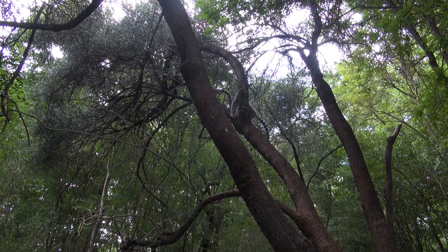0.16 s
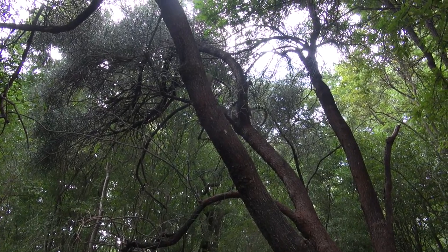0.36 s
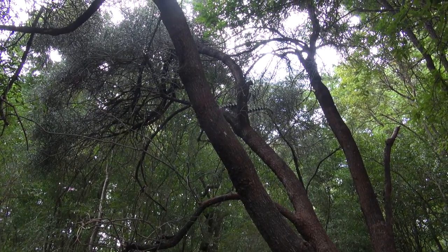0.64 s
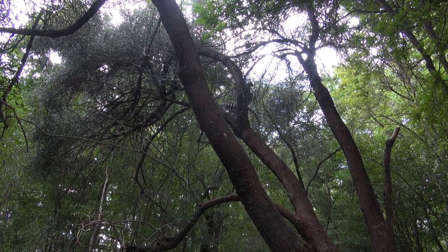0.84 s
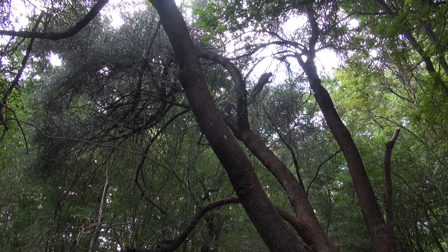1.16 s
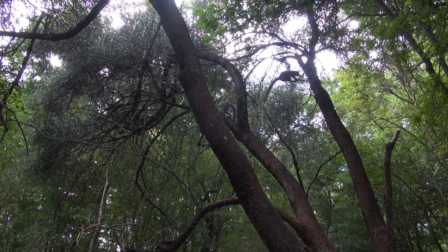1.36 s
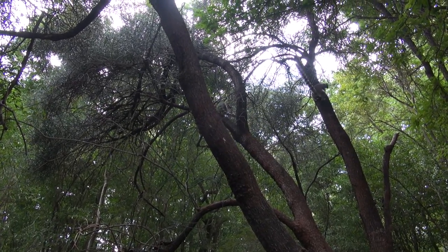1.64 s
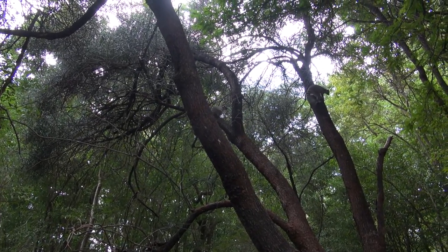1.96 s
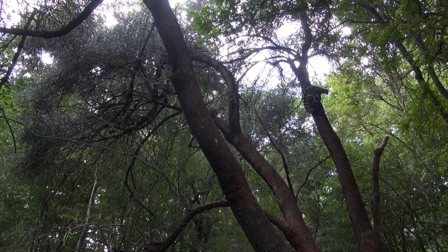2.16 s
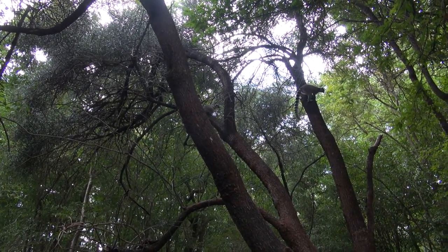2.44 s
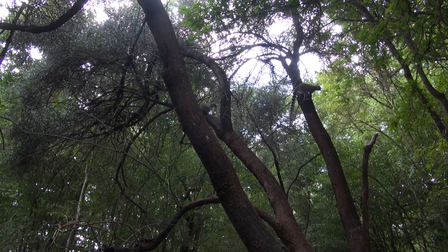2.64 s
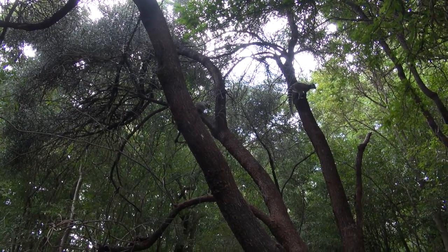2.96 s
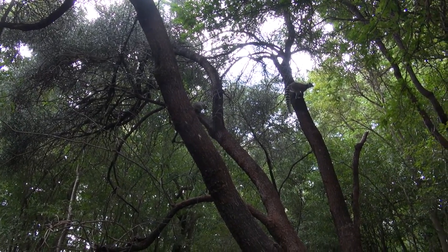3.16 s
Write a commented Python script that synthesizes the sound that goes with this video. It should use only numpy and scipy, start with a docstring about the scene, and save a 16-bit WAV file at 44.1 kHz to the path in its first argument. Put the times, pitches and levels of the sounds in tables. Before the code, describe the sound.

A lemur close by gives very short nasal grunts with tiny mouth ticks, sparse at first, quicker from 1.3 to 2.6 seconds, loudest at 3. Faint twig snaps and leaf brushes come at the start and around 1.1 seconds. From 1.4 to 1.8 seconds another lemur chitters four high, rising, rattling squeaks that scatter off the trees. Soft hiss and a faint camera whir run throughout.

```python
"""A quiet forest, with lemurs. One, close to the microphone, gives short nasal grunts: throat pulses
ringing in nose and mouth, with tiny ticks as the mouth opens. Another, leaping between trunks, gives a
harsh four-note chitter, a squeak chopped into a rattle. Twigs snap, leaves brush and a far bird sounds
one thin note. Calls and snaps scatter off the trunks; under it all lie a soft hiss and the whir and
hum of the camera."""
import sys
import numpy as np
from scipy import signal
from scipy.fft import rfft, irfft
from scipy.io import wavfile
from scipy.ndimage import uniform_filter1d

SR = 44100
rng = np.random.default_rng(int(sys.argv[2]) if len(sys.argv) > 2 else 0)


def store_wav(level_fs):
    """Save 16-bit WAV to argv[1]."""
    pcm = np.round(np.clip(np.atleast_2d(level_fs), -1, 1) * 32767)
    wavfile.write(sys.argv[1], SR, pcm.T.astype(np.int16))


N = 145530

# The close lemur's grunts; the strongest may come in two quick pushes (start [s], length [s],
# level [dB], pitch [Hz], pitch rise [share], rasp re voice [dB], mouth resonance [Hz], mouth gain [dB])
GRUNTS = [(0.0, .011, -44, 197, -0.14, -12.5, 370, -8), (0.449, 0.02, -41.5, 256, 0.13, -20, 536, -9),
          (0.475, 0.015, -40, 270, 0.32, -18, 667, 16), (0.852, 0.019, -37, 265.7, 0.093, -18.5, 530, -5),
          (1.317, 0.014, -48, 178.4, 0.3, -13, 260, 5), (1.455, 0.023, -38.5, 308, 0.23, -10, 315, -12),
          (1.568, 0.0092, -46.5, 182, 0.09, -9, 545, 13), (1.69, 0.017, -45, 180, 0.013, -12.5, 550, 11),
          (1.803, 0.025, -49, 173.3, 0.021, -8.5, 560, 11), (1.915, 0.025, -51, 177.4, 0.18, -11, 523, 7),
          (2.034, 0.0085, -54, 191, -0.068, -11, 546, 12), (2.151, .012, -49, 181, .12, -13, 534, 14),
          (2.278, 0.011, -41.5, 268.4, 0.029, -12.5, 675, 14), (2.2905, .015, -39, 267, -.15, -16, 620, 4),
          (2.399, 0.019, -53, 258, 0.048, -9, 540, -1), (2.466, 0.015, -52.5, 243, .072, -26, 540, -3),
          (2.534, 0.017, -48.5, 244, 0.065, -17, 400, 8), (2.596, 0.011, -52, 218, .07, -28, 456, -18),
          (2.883, 0.0163, -46.5, 199, 0.018, -22, 205, -4), (3.001, .016, -40, 307, 0.066, -9, 690, 10),
          (3.0171, 0.015, -35, 273.3, -0.18, -13.5, 527, -3)]
# The nose's colouring of the voice (frequency [Hz], gain [dB])
NOSE_SPECTRUM = [(40, -56.5), (90, -20.5), (140, 0.5), (190, 4), (280, 1.5), (400, 4), (550, -1),
                 (680, -.5), (800, -7), (950, -12.5), (1250, -18), (1550, -16.5), (2100, -14.5),
                 (4000, -32), (16000, -71)]
# Resonances of the rasp (frequency [Hz], width [Hz], relative level [dB])
RASP_MODES = [(1574, 440, 7.5), (2020, 290, 1), (3410, 630, 5.5), (5350, 750, 2.5), (6460, 1770, 8),
              (7400, 340, 3.5), (9200, 990, 4), (12000, 1300, -3)]
# Ticks as the mouth opens (time [s], level [dB], frequency [Hz])
MOUTH_TICKS = [(0.4441, -46.5, 8700), (.4495, -46, 5640), (.465, -45.5, 9570), (.849, -47.5, 9000),
               (0.871, -55, 7840), (1.315, -45.5, 8000), (1.454, -42, 9600), (1.469, -55, 9500),
               (1.639, -57, 10400), (1.688, -55, 9200), (1.802, -54, 9200), (1.917, -51, 7700),
               (2.034, -54, 7760), (2.097, -53.5, 6740), (2.275, -44, 9200), (2.463, -53, 7800),
               (2.533, -47, 7400), (2.596, -53, 8100), (3.025, -49, 7400), (3.0293, -46, 9200)]
# The second lemur's notes (start [s], length [s], level [dB], first pitch [Hz], last pitch [Hz],
# rattle rate [Hz])
CHITTER_NOTES = [(1.412, 0.11, -51.5, 4370, 5630, 206.5), (1.543, 0.068, -48.5, 4355, 5140, 235),
                 (1.63, .076, -47.8, 4416, 5110, 223), (1.749, 0.072, -48.5, 4284, 4630, 203.5)]
# Breath in the chitter (frequency [Hz], gain [dB])
BREATH_SPECTRUM = [(1000, -28), (2500, -15), (3500, -4), (4000, -5), (4900, 0), (5700, -8), (7000, -15),
                   (9000, -22), (16000, -40)]
# Twigs breaking (time [s], level [dB], frequency [Hz], splinter decay [s])
TWIG_SNAPS = [(0.037, -58.5, 8100, 0.00089), (0.2639, -57, 6400, 0.0004), (.8945, -51.5, 5580, 0.0006),
              (1.098, -47, 8100, 0.00023), (1.1105, -66, 8200, .002), (1.119, -52.5, 8400, 0.0045)]
# Colour of cracking wood (multiple of the snap's frequency [ratio], gain [dB])
CRACK_SPECTRUM = [(.1, -36), (.4, -28), (.68, -23), (.82, -2), (1.05, 0), (1.32, -9), (1.5, -5),
                  (1.68, -14), (1.8, -30)]
# Leaves brushing (middle [s], half length [s], level [dB], frequency [Hz])
LEAF_BRUSHES = [(0.036, 0.023, -56, 7400), (0.228, 0.011, -58, 6550), (0.277, 0.026, -57, 7200),
                (1.07, 0.037, -54, 7040), (1.12, 0.028, -55, 8100), (1.22, 0.026, -58.5, 5200)]
# A far bird's faint note (middle [s], half length [s], level [dB], pitch [Hz])
BIRD_NOTE = (.74, .06, -69, 4620)
# The camera's whir (frequency [Hz], width [Hz], left level [dB], right level [dB], right lag [rad])
WHIR_BANDS = [(236.4, 12.4, -68, -67.5, 0.92), (305, 37, -67, -68.5, 0.5), (950, 100, -57.5, -53, 1.885),
              (1056, 41, -86.5, -56.5, 3.14)]
# Colour of the hiss (frequency [Hz], relative density [dB])
HISS_SPECTRUM = [(20, 6), (38, -32), (60, 8.5), (100, 9), (170, 7.5), (300, 15.5), (450, 18), (700, 11),
                 (1100, 15), (1400, 10.5), (2500, 5.5), (6000, 3), (10000, 0.5), (16000, -3)]
# Likeness of the hiss on the microphone's two sides (frequency [Hz], correlation [-1 to 1])
HISS_CORRELATION = [(30, 0.98), (100, 0.65), (280, 1), (430, -0.83), (600, 0.1), (1100, -0.72),
                    (2000, -0.59), (3500, -0.12), (7000, -0.036), (15000, 0.092)]

START_EFFORT, CREST_AT, END_EFFORT = .6, .62, .47  # a grunt swells, then breaks off
MOUTH_WIDTH_HZ, PUFF_DECAY_CYCLES, RIGHT_LAG_S = 44, .28, .00021
CHEST_HZ, CHEST_WIDTH_HZ, CHEST_DB = 163.2, 55, -61.5  # a faint thud, alike in loud and soft grunts
TICK_SIGMA_S, TICK_GLIDE_PER_S, TICK_WIDTH_HZ = .0012, 70, 3300
RATTLE_SHARPNESS, SQUEAK_WOBBLE_HZ = 1.5, 195
FIRST_BREATH_DB, LAST_BREATH_DB = 1, -6  # each chitter note is purer than the one before
SPLINTER_DB, SPLINTER_SPREAD_DB = -9, 6
HUM_HZ, HUM_DB, HISS_DB = 50, -80, -54.5
FOREST_T60_S, ECHO_BUILD_S, EARLY_DB, EARLY_DECAY_S = .35, .006, 10, .04
BAND_LIMIT_HZ = 15900


def grunts():
    """Close by: a handful of throat pulses ring nose, mouth and chest, each with a puff of rasp."""
    out, t = np.zeros((2, N)), np.arange(4096) / SR
    for start, length, db, hz, rise, rasp_db, mouth_hz, mouth_db in GRUNTS:
        progress = np.minimum(t / length, 1)
        sounding = progress < 1
        effort = np.interp(progress, [0, CREST_AT, 1], [START_EFFORT, 1, END_EFFORT]) * sounding
        glide = 1 + rise * (progress - .5)  # moves pitch and mouth resonance together
        folds, since_pulse = pulses(hz * glide, jitter=.028, shimmer=.2)
        throat = -folds * effort
        nasal = colour(throat, NOSE_SPECTRUM)
        mouth = resonate(nasal, mouth_hz * glide, MOUTH_WIDTH_HZ, order=1)
        voice = unit(nasal + amp(mouth_db) * mouth)
        # the voice reaches the microphone's right side later
        voice = np.array([voice, np.interp(t - RIGHT_LAG_S, t, voice, left=0)])
        chest = unit(resonate(throat, CHEST_HZ, CHEST_WIDTH_HZ))
        puffs = stereo_noise(.48, size=4096) * (.38 + np.exp(-since_pulse / PUFF_DECAY_CYCLES))
        puffs *= sounding
        rasp = unit(sum(amp(gain) * unit(resonate(puffs, f, width)) for f, width, gain in RASP_MODES))
        grunt = amp(db) * (voice + amp(rasp_db) * rasp) + amp(CHEST_DB) * chest
        add(out, start, np.sqrt(length / t[-1]) * grunt)  # levels hold over the grunt's own length
    return forest(out, echo_db=-12)


def mouth_ticks():
    """Tiny wet upward flicks of the mouth around the grunts."""
    out, t = np.zeros((2, N)), np.arange(-256, 256) / SR
    for time, db, hz in MOUTH_TICKS:
        rising_hz = hz * np.exp(TICK_GLIDE_PER_S * t)
        flick = unit(resonate(stereo_noise(.76, size=512), rising_hz, TICK_WIDTH_HZ))
        add(out, time + t[0], amp(db) * flick * np.exp(-.5 * (t / TICK_SIGMA_S) ** 2))
    return forest(out, echo_db=-1)


def chitter():
    """Among the trunks: four rising squeaks, each chopped into a fast rattle, with breath around it."""
    out = np.zeros((2, N))
    breathiness = np.linspace(FIRST_BREATH_DB, LAST_BREATH_DB, len(CHITTER_NOTES))
    for (start, length, db, first_hz, last_hz, rattle_hz), breath_db in zip(CHITTER_NOTES, breathiness):
        progress = np.arange(0, 1, 1 / (length * SR))
        n = len(progress)
        kicks, since_kick = pulses(np.full(n, rattle_hz), jitter=.1, shimmer=.3)
        latest_kick = np.maximum.accumulate(np.arange(n) * (kicks > 0))
        rattle = kicks[latest_kick] * abs(np.sin(np.pi * since_kick)) ** RATTLE_SHARPNESS
        wobble = unit(uniform_filter1d(rng.standard_normal(8192), size=90))[:n]
        hz = first_hz + (last_hz - first_hz) * progress + SQUEAK_WOBBLE_HZ * wobble
        squeak = unit(rattle * np.sin(2 * np.pi * np.cumsum(hz) / SR))
        air = stereo_noise(.66)[:, :n] * (4 + rattle)
        breath = unit(np.array([colour(side, BREATH_SPECTRUM) for side in air]))
        swell = np.sin(np.pi * progress ** 1.2) ** .7
        add(out, start, amp(db) * (squeak + amp(breath_db) * breath) * swell)
    return forest(out, echo_db=-5)


def twigs():
    """Dry snaps, each a click and a gritty splintering of fibres, scatter off the trunks."""
    out, t = np.zeros((2, N)), np.arange(1024) / SR
    for time, db, hz, decay in TWIG_SNAPS:
        noise = stereo_noise(.2, size=1024)
        grit = amp(SPLINTER_SPREAD_DB * np.minimum(rng.exponential(1, len(t)), 4))
        splinters = amp(SPLINTER_DB) * unit(noise * grit) * np.exp(-t / decay)
        click = t == 0
        wood = [(hz * multiple, gain) for multiple, gain in CRACK_SPECTRUM]
        crack = np.array([colour(click + side, wood) for side in splinters])
        add(out, time, amp(db) * unit(crack))
    return forest(out, echo_db=-5.5)


def leaves():
    """Leaves brush in short swishes of fine grains."""
    out, t = np.zeros((2, N)), np.arange(8192) / SR
    for middle, half, db, hz in LEAF_BRUSHES:
        start = max(middle - 2 * half, 0)
        grains = stereo_noise(.46) * amp(3.3 * rng.exponential(1, len(t)))
        swish = unit(resonate(grains, hz, width_hz=7200))
        add(out, start, amp(db) * swish * np.exp(-((t + start - middle) / half) ** 2))
    return out


def bird():
    """Far off: one thin note, blurred by distance."""
    middle, half, db, hz = BIRD_NOTE
    note = unit(resonate(stereo_noise(.35, size=N), hz, width_hz=200))
    return amp(db) * note * np.exp(-((np.arange(N) / SR - middle) / half) ** 2)


def camera_whir():
    """At the microphone: the camera's narrow resonances, out of step between left and right."""
    out, hz = np.zeros((2, N)), np.fft.rfftfreq(N, 1 / SR)
    for centre, width, left_db, right_db, lag in WHIR_BANDS:
        band = rfft(rng.standard_normal(N)) / np.sqrt(1 + (2 * (hz - centre) / width) ** 4)
        out[0] += amp(left_db) * unit(irfft(band, N))
        out[1] += amp(right_db) * unit(irfft(band * np.exp(-1j * lag), N))
    return out


def camera_hum():
    """A faint steady hum in the camera."""
    return amp(HUM_DB) * unit(np.sin(2 * np.pi * HUM_HZ * np.arange(N) / SR))


def hiss():
    """A soft steady bed of noise, its stereo width changing with frequency."""
    hz = np.fft.rfftfreq(N, 1 / SR)
    left, independent = rfft(rng.standard_normal((2, N)))
    likeness = np.clip(curve_at(HISS_CORRELATION, hz), -1, 1)
    right = likeness * left + np.sqrt(1 - likeness ** 2) * independent
    spectrum = np.array([left, right]) * amp(curve_at(HISS_SPECTRUM, hz))
    return amp(HISS_DB) * unit(irfft(spectrum, N))


def forest(x, echo_db):
    """Adds scatter from near trunks and a faint longer tail."""
    t = np.arange(SR // 2) / SR
    early = amp(EARLY_DB) * np.exp(-t / EARLY_DECAY_S)
    tail = amp(-60 * t / FOREST_T60_S)
    onset = np.minimum(t / ECHO_BUILD_S, 1) ** 2
    sparse = rng.standard_normal((2, len(t))) * (rng.random((2, len(t))) < .15)
    echoes = sparse * (early + tail) * onset
    echoes /= np.linalg.norm(echoes[0])
    return x + amp(echo_db) * signal.fftconvolve(x, echoes, axes=1)[:, :N]


def amp(db):
    """Decibels to gain."""
    return 10 ** (np.asarray(db) / 20)


def unit(x):
    """Scales to an rms of one."""
    return x / np.sqrt(np.mean(abs(x) ** 2) + 1e-20)


def curve_at(points, hz):
    """Interpolates a curve on a log-frequency axis."""
    f, value = np.transpose(points)
    return np.interp(np.log(hz + 1), np.log(f), value)


def add(mix, start_s, sound):
    """Adds a sound to the mix at its start time."""
    part = mix[..., max(round(start_s * SR), 0):][..., :sound.shape[-1]]
    part += sound[..., :part.shape[-1]]


def resonate(x, hz, width_hz, order=2):
    """A resonance whose centre may move; steep at order two."""
    carrier = np.exp(2j * np.pi * np.cumsum(hz * np.ones(x.shape[-1])) / SR)
    pole = np.exp(-np.pi * width_hz / SR)
    envelope = signal.lfilter([(1 - pole) ** order], np.poly([pole] * order), x / carrier + 1e-18)
    return 2 * (carrier * envelope).real


def colour(x, spectrum, size=2048):
    """Minimum-phase filter with the given spectrum."""
    log_gain = np.log(amp(curve_at(spectrum, abs(np.fft.fftfreq(size, 1 / SR)))))
    impulse = np.fft.ifft(np.exp(np.conj(signal.hilbert(log_gain)))).real
    return signal.fftconvolve(x, impulse)[:len(x)]


def pulses(hz, jitter, shimmer):
    """Pulses uneven in spacing (jitter) and strength (shimmer); also the cycles since each pulse."""
    late, loud = rng.standard_normal((2, 64))
    turns = np.cumsum(hz) / SR
    marks = np.r_[0, np.cumsum(np.exp(jitter * late))]
    cycle = np.searchsorted(marks, turns) - 1
    onsets = np.diff(cycle, prepend=-1).clip(0, 1)
    return onsets * np.exp(shimmer * loud[cycle]), turns - marks[cycle]


def stereo_noise(likeness, size=8192):
    """Partly alike noise for left and right."""
    shared, own = rng.standard_normal(size), rng.standard_normal((2, size))
    return np.sqrt(likeness) * shared + np.sqrt(1 - likeness) * own


def scene():
    """Lemurs, foliage and background as they reach the microphone."""
    lemurs = grunts() + mouth_ticks() + chitter()
    return lemurs + twigs() + leaves() + bird() + hiss() + camera_whir() + camera_hum()


def record(dry):
    """The recorder's band limit."""
    lowpass = signal.firwin(511, BAND_LIMIT_HZ, window=("kaiser", 9), fs=SR)
    return signal.oaconvolve(dry, lowpass[None], "same")


dry = scene()
out = record(dry)
store_wav(out)
```